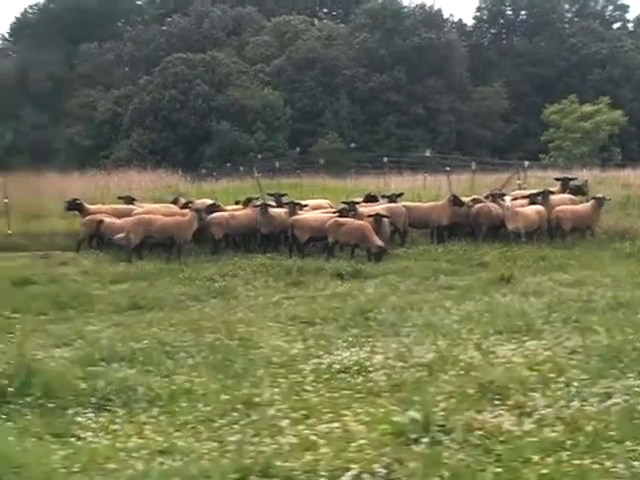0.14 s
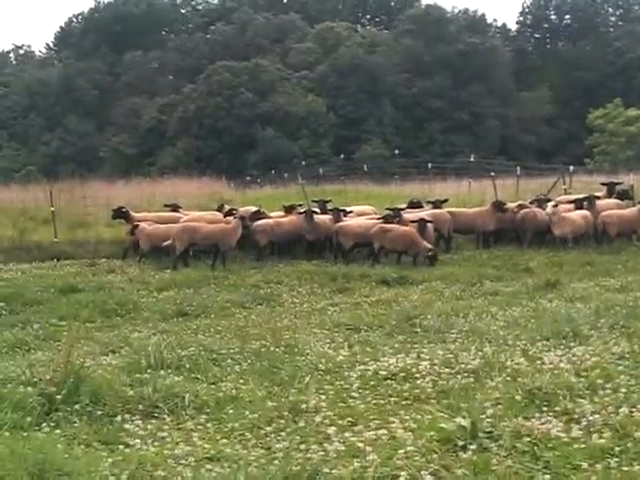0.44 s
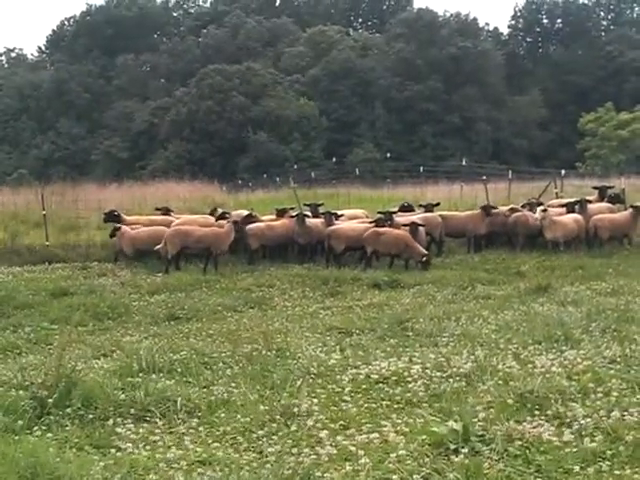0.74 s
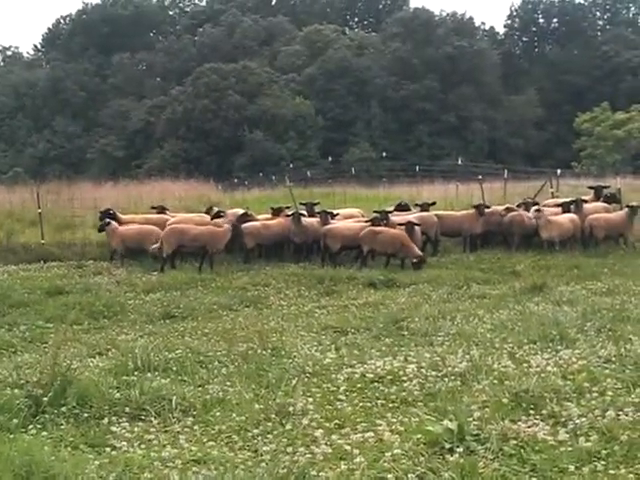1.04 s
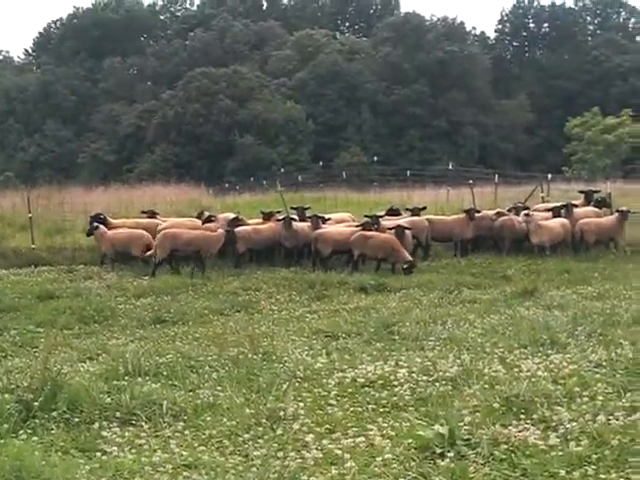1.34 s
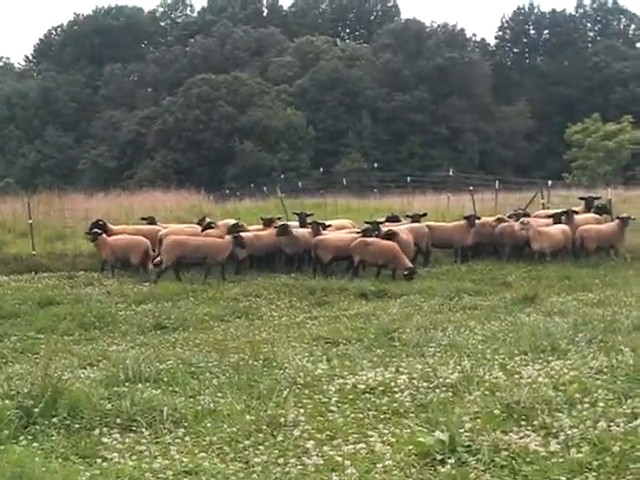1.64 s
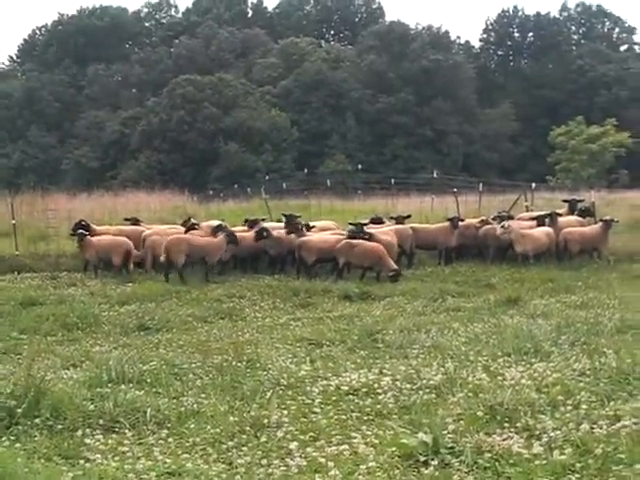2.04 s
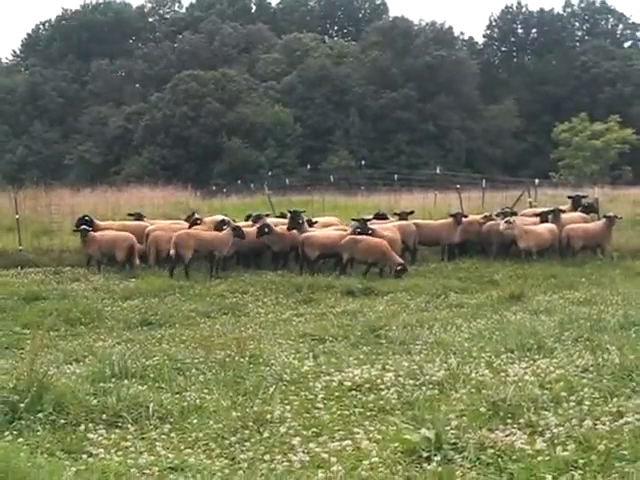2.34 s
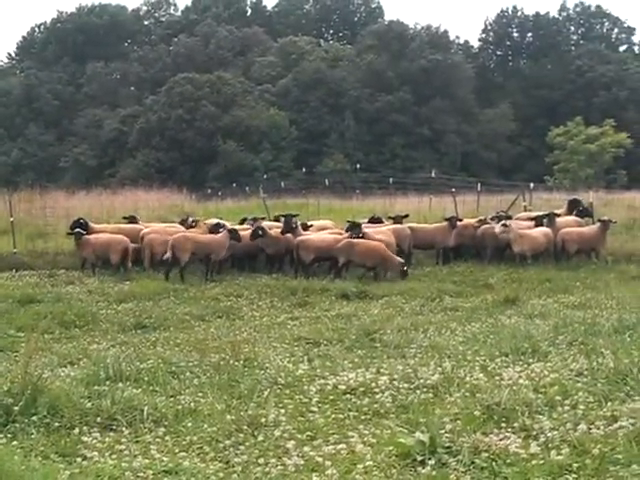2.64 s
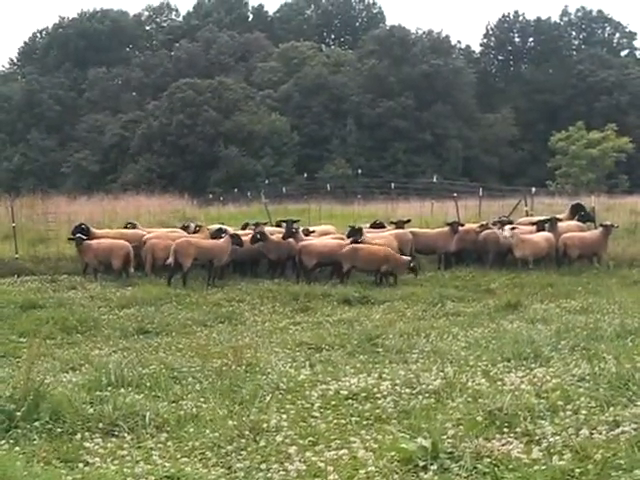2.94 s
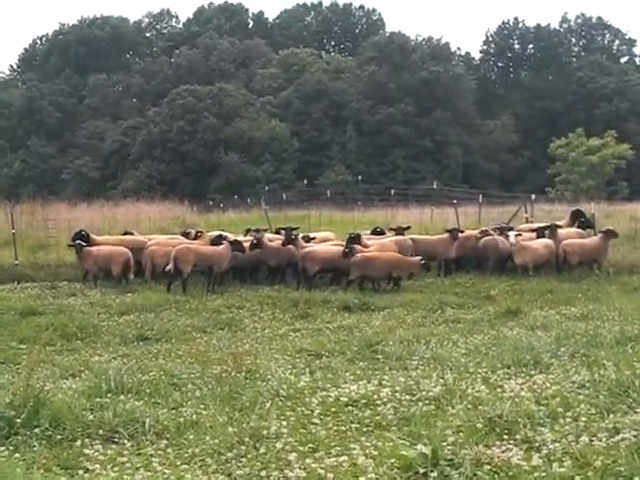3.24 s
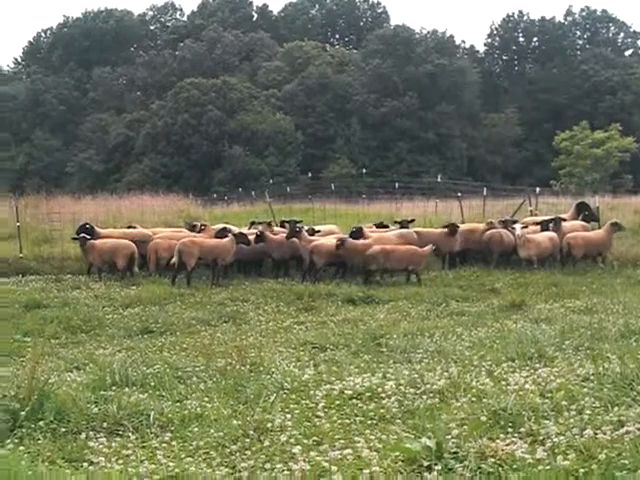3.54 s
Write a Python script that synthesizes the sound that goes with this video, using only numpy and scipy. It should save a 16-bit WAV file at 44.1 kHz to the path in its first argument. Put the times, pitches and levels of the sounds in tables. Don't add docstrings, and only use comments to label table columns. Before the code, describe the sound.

A flock's bleats, one stuttering, one long, one low, over rapid katydid and cricket chirps.

```python
import sys
import numpy as np
from scipy import signal
from scipy.io import wavfile

SR = 44100
rng = np.random.default_rng(int(sys.argv[2]) if len(sys.argv) > 2 else 0)


def how_loud(loudness_db):
    steps = np.asarray(loudness_db, float) / 20
    return 10 ** steps


def generate_wav(sig):
    pcm = np.round(np.clip(np.atleast_2d(sig).T, -1, 1) * 32767).astype(np.int16)
    wavfile.write(sys.argv[1], SR, pcm)


N = 162288
T = np.arange(N) / SR


def columns(rows):
    s, *rest = np.transpose(rows)
    return [np.interp(T, s, c) for c in rest]


def drift(rate_hz):
    r = np.exp(-2 * np.pi * rate_hz / SR)
    slow = signal.lfilter([1], [1, -2 * r, r * r], rng.standard_normal(N + SR))[SR:]
    return slow / slow.std()


def gate(start_s, length_s, edge_s):
    inside_s = np.minimum(T - start_s, start_s + length_s - T)
    return np.sin(np.pi / 2 * np.clip(inside_s / edge_s + .5, 0, 1)) ** 2


def coloured(spectrum, patchy_db):
    hz, db = np.transpose(spectrum)
    out, white = 0, rng.standard_normal((2, N + SR // 4))
    edges = np.geomspace(max(hz[0], 25), min(hz[-1], 13000), 22)
    for k, (low, high) in enumerate(zip(edges, edges[1:])):
        sos = signal.butter(2, [low, high], "band", fs=SR, output="sos")
        band = signal.sosfilt(sos, white[k % 2])[-N:]
        level_db = np.interp(np.log(low * high) / 2, np.log(hz), db)
        out = out + band * how_loud(level_db + patchy_db * drift(4.1))
    return out / out.std()


# pitch_hz, density_db_per_hz
WIND = [(25, -34), (50, -25.5), (70, -5), (120, -0.5), (300, -9.5), (430, -14.5), (1600, -23.5)]


def wind():
    return how_loud(-47) * coloured(WIND, patchy_db=1.5)


# pitch_hz, density_db_per_hz
CHORUS = [(1600, -13.5), (3000, -19), (5000, -20.5), (6500, -17), (7600, -14), (9500, -2), (10600, -6.5),
          (12600, -9.5)]


def chorus():
    return how_loud(-44.5) * coloured(CHORUS, patchy_db=0.6)


# start_s, length_s, level_db; the undertone lies an octave below the second
FAR_FIRST = [(0, 1.1, -73), (0, 0.064, -58), (.08, .06, -57.5), (.16, 0.048, -56), (.195, 0.05, -53.5),
             (.29, 0.025, -60), (.325, 0.055, -51.5), (.39, 0.053, -53.5), (.458, 0.027, -57),
             (.505, 0.017, -55), (.555, 0.026, -51), (.603, 0.036, -59), (.665, 0.11, -58.5),
             (.816, 0.022, -58.5), (.85, 0.097, -60), (.958, 0.06, -60), (1.062, 0.066, -59.5),
             (1.18, 0.028, -59), (1.24, .05, -60)]
FAR_SECOND = [(2.42, 0.21, -58.5), (2.62, 0.49, -58), (3.175, 0.054, -56), (3.255, 0.062, -60),
              (3.17, 0.226, -60.5), (3.39, 0.19, -59.5), (3.468, .036, -61), (3.55, 0.11, -52)]
FAR_UNDERTONE = [(2.42, 0.2, -59.5), (2.75, .4, -56), (3.17, 0.23, -60), (3.45, 0.22, -60)]
# start_s, pitch_hz
FAR_FIRST_PITCH = [(0, 1821), (1.3, 1797)]
FAR_SECOND_PITCH = [(2.4, 1618), (2.85, 1616), (3.18, 1566), (3.68, 1564)]


def far_sheep(bursts, pitch, multiple):
    hz = columns(pitch)[0] * (1 + 0.00402 * drift(25.0))
    turn = 2 * np.pi * np.cumsum(hz) / SR
    level = sum(how_loud(db) * gate(start, length, 0.021) for start, length, db in bursts)
    level = level * how_loud(1.7 * drift(25))
    return np.sqrt(2) * level * np.sin(multiple * turn)


# start_s, end_s, buzzes_per_s
BUZZES = [
    (0, 2.03, 80.4),
    (2.33, 3.68, 85.5),
]


def buzzer():
    beat = 0
    for start, end, rate in BUZZES:
        pulse = (.5 + .5 * np.cos(2 * np.pi * rate * T + 1.0)) ** 1.5
        beat = beat + gate(start, end - start, .05) * pulse
    high = signal.butter(3, 9770, "high", fs=SR, output="sos")
    return how_loud(-36.5) * beat * signal.sosfilt(high, rng.standard_normal(N))


def strokes(times_s, levels_db, length_s, hz, fall_hz, bend):
    out = np.zeros(N + SR)
    u = np.arange(int(length_s * SR)) / (length_s * SR)
    chances = rng.standard_normal((len(times_s), 3))
    for s, db, (pitch_chance, phase_chance, level_chance) in zip(times_s, levels_db, chances):
        stroke_hz = hz * (1 + .003 * pitch_chance) - fall_hz * u ** bend
        turn = 2 * np.pi * np.cumsum(stroke_hz) / SR + 3 * phase_chance
        i = int(max(s, 0) * SR)
        out[i:i + len(u)] += how_loud(db + 1.05 * level_chance) * np.sin(np.pi * u) ** 0.49 * np.sin(turn)
    return out[:N]


# start_s, end_s, pulses_per_s, level_db
TRILLS = [
    (0.014, .09, 66, -55.5),
    (0.093, 0.202, 49, -55.5),
    (0.223, .33, 56, -56),
    (1.839, 2.694, 61, -57.5),
]


def low_trills():
    rows = [(s, db) for a, b, rate, db in TRILLS for s in np.arange(a, b, 1 / rate)]
    return strokes(*np.transpose(rows), 0.011, 4794, 240, 1.0)


# start_s, chirps_so_far
CRICKET_COUNT = [
    [(.014, 0), (.476, 8), (.941, 16), (1.409, 24), (1.877, 32), (1.994, 34)],
    [(2.366, 0), (2.432, 1), (2.828, 8), (3.234, 15), (3.644, 22)],
]


def cricket():
    runs = []
    for run in CRICKET_COUNT:
        s, count = np.transpose(run)
        runs.append(np.interp(np.arange(run[-1][1] + 1), count, s))
    when = np.concatenate(runs)
    return strokes(when - .003, np.full(len(when), -41.), 0.0182, 8750, 790, 4.0)


CHIRP_S = [.0888, .2115, .3408, .4498, .5481, .658, .766, .8696, .9734, 1.0757, 1.181, 1.2845, 1.3916,
           1.5177, 1.64, 1.7546, 1.8636, 1.9755, 2.091, 2.2031, 2.327, 2.4272, 2.5305, 2.6379, 2.7755,
           2.8981, 3.0087, 3.13, 3.2585, 3.39, 3.6085]
LONGER_AFTER_S = [1.45, 3.2]


def katydid():
    spacing_s, stroke_db = .0069, [-38, -32.5, -32.5]
    counts = 4 + np.searchsorted(LONGER_AFTER_S, CHIRP_S)
    rows = [(s - .0026 - spacing_s * (n - 1 - k), stroke_db[min(k, 2)])
            for s, n in zip(CHIRP_S, counts) for k in range(n)]
    return strokes(*np.transpose(rows), .0052, 9782, 680, 2.32)


def voice(start, end, pitch, mouth, hum, throat, jitter, lift_db, bright_db, skirt, snap, hum_fall_db,
          shimmer_db, nose=0 * T, sign=-1):
    part = slice(int(start * SR), int(end * SR))
    hz = (pitch * (1 + jitter * drift(52)))[part]
    k = np.arange(1, 40)[:, None]
    overtone_hz = k * pitch[part]
    lift = how_loud(lift_db + 0 * T)[part]
    tract = 0
    for n, (centre, width, db) in enumerate(throat):
        ring_hz = centre * lift ** (centre < 4000)
        peak = sign ** n * how_loud(db + shimmer_db * drift(13.5)[part])
        tract = tract + peak / (1 + 2j * (overtone_hz - ring_hz) / width) ** skirt
    tract *= how_loud((bright_db + 0 * T)[part] * np.log2(overtone_hz / 2300))
    tract *= 1 + snap * np.exp(-2j * np.pi * k * .62 - ((overtone_hz - 2540) / 860) ** 2)
    tract /= np.sqrt(np.sum(abs(tract) ** 2, axis=0))
    breath = 0.084 * shimmer_db * drift(1300)
    gains = tract * (mouth * (how_loud(shimmer_db * drift(53)) + breath))[part]
    gains += hum[part] * how_loud(-hum_fall_db * np.log2(k))
    gains += nose[part] / (1 + 2j * (overtone_hz - 1340) / 290) ** 2
    turns = np.cumsum(hz) / SR
    out = np.zeros(N)
    out[part] = np.sqrt(2) * np.real(np.sum(gains * np.exp(2j * np.pi * k * turns), axis=0))
    return out * gate(start + 0.0042, end - start - .008, 0.0055)


# centre_s, length_s, level_db, pitch_hz, brightness_db_per_octave
PUFFS = [(1.449, 0.038, -52, 175.2, -5), (1.505, 0.023, -56, 165.2, -3), (1.539, 0.016, -55, 180.5, -6),
         (1.554, .012, -46.5, 182.6, 3), (1.593, 0.024, -42.5, 181.4, 3), (1.63, 0.026, -46.5, 173.9, -3.5),
         (1.666, 0.0244, -37, 177.3, 0), (1.715, 0.022, -36.5, 196.3, 3), (1.741, 0.0314, -38, 204.7, -3),
         (1.796, 0.0198, -39, 191.1, 1), (1.836, 0.0339, -39, 194.9, -1), (1.868, 0.03, -39.5, 202.7, 0),
         (1.921, 0.0362, -41.5, 205.2, -2), (1.954, 0.017, -49, 196.3, 9), (1.983, 0.041, -45, 208.6, 6),
         (2.042, 0.034, -46, 202.2, -2), (2.087, 0.047, -47.5, 204.6, 10), (2.125, 0.025, -54, 209.7, 11),
         (2.189, 0.037, -50, 204, 6)]
# start_s, hum_db, jitter_share
STUTTER_HUM = [
    (1.39, -75, 0.03),
    (1.43, -43, 0.029),
    (1.57, -47.5, 0.028),
    (1.62, -57, 0.033),
    (1.77, -53, 0.02),
    (1.82, -44.5, 0.0077),
    (2.02, -40.5, 0.0052),
    (2.2, -39, 0.0049),
    (2.24, -55, 0.0062),
]
# centre_hz, width_hz, level_db
STUTTER_THROAT = [(750, 160, -15), (1360, 240, -7.5), (1850, 190, -4.5), (2308, 210, 3), (2930, 245, -2.5),
                  (3620, 260, -16.5), (4900, 560, -27)]


def stutter():
    s, length, db, hz, bright_db = np.transpose(PUFFS)
    glide = 151 * length / 2
    knots_s = np.ravel([s - length / 2, s + length / 2], "F")
    pitch = np.interp(T, knots_s, np.ravel([hz - glide, hz + glide], "F"))
    blown = np.minimum(1, sum(gate(a - n / 2, n, 0.026) for a, n in zip(s, length)))
    pitch -= 11.0 * (1 - blown)
    mouth = sum(how_loud(d) * gate(a - n * 0.47, n * 0.96, .016) for a, n, d in zip(s, length, db))
    mouth = mouth + how_loud(-53) * gate(1.57, 0.657, 0.032)
    hum_db, jitter = columns(STUTTER_HUM)
    nose = how_loud(-55 + 3.0 * drift(12)) * gate(1.72, .5, .05)
    return voice(1.39, 2.25, pitch + 3.2 * drift(20.1), mouth, how_loud(hum_db), STUTTER_THROAT,
                 jitter=0.804 * jitter, lift_db=0.21 * drift(7.6), bright_db=np.interp(T, s, bright_db),
                 skirt=1.4, snap=0, hum_fall_db=17.4, shimmer_db=1.9, nose=nose)


# start_s, pitch_hz, mouth_db, hum_db, resonance_lift_db
HUMMED = [
    (2.31, 251.3, -75, -58, 0),
    (2.33, 245, -59, -40, -1),
    (2.365, 200.5, -44, -36, -0.4),
    (2.386, 163.3, -36.5, -35.5, -0.5),
    (2.41, 169.1, -37, -38.5, -0.7),
    (2.45, 175.6, -38.5, -37.5, -0.4),
    (2.526, 180, -41, -35, -0.04),
    (2.566, 180, -41, -34, -0.1),
    (2.59, 178.3, -46, -33.5, 0),
]
OPENED = [
    (2.606, 179, -43, -38, -.7),
    (2.626, 182.4, -35.5, -43, -0.2),
    (2.655, 178.2, -38.5, -39, -0.1),
    (2.704, 187.8, -32.5, -40, 0.06),
    (2.74, 182.4, -33, -40.5, 0),
    (2.79, 187.5, -31, -39.5, 0.12),
    (2.89, 185.5, -29.5, -40, 0.18),
    (3.11, 176.5, -38.5, -47, 0.18),
    (3.174, 170, -52.5, -44, -.5),
]
# centre_hz, width_hz, level_db
CLOSED_THROAT = [(575, 170, -11.5), (1195, 250, -4.5), (1880, 580, -2), (2540, 490, 4.5), (5170, 450, -15),
                 (5950, 560, -15)]
OPEN_THROAT = [(550, 180, -16), (1416, 180, 1.5), (1780, 320, -16), (2343, 188, 4.5), (2700, 180, -11.5),
               (3020, 210, -12.5), (3790, 380, -23.5), (4840, 570, -19), (5900, 1200, -27)]


def long_bleat():
    pitch, mouth_db, hum_db, lift_db = columns(HUMMED + OPENED + [(3.21, 165, -66, -50, -.6)])
    mouth, hum = how_loud(mouth_db), how_loud(hum_db)
    closed = voice(2.31, 2.602, pitch, mouth, hum, CLOSED_THROAT, jitter=0.00092, lift_db=lift_db,
                   bright_db=2.8 * lift_db, skirt=1.88, snap=0, hum_fall_db=23.5, shimmer_db=0.26)
    opened = voice(2.594, 3.21, pitch, mouth, hum, OPEN_THROAT, jitter=0.00088, lift_db=lift_db,
                   bright_db=2.4 * lift_db, skirt=1.9, snap=0, hum_fall_db=12.0, shimmer_db=0.2)
    return closed + opened


# start_s, pitch_hz, mouth_db, hum_db, resonance_lift_db
MUTTER = [
    (3.12, 106, -61, -42, 6),
    (3.145, 108.8, -46, -42.5, -0.4),
    (3.22, 119.3, -49, -43, 0.1),
    (3.27, 126.4, -59, -46, .3),
    (3.36, 131.5, -58, -45.5, 1.5),
    (3.48, 134.3, -57, -40.5, 2.1),
    (3.535, 127.3, -50, -46, 0),
]
GRUMBLE = [
    (3.536, 132, -44, -42, -.2),
    (3.55, 129.2, -37.5, -50, -0.016),
    (3.578, 130.7, -37.5, -60, -0.041),
    (3.604, 120.6, -41, -54, -0.12),
    (3.618, 120.7, -38.5, -39, -0.12),
    (3.636, 129.3, -39.5, -52.5, -0.036),
    (3.656, 130.2, -37.5, -54, -0.038),
    (3.68, 129, -36.5, -50, -0.016),
]
# centre_hz, width_hz, level_db
MUTTER_THROAT = [(280, 74, -5.5), (1032, 330, -8), (1855, 430, -2), (2750, 340, -14)]
LOW_THROAT = [(336, 82, 0), (625, 120, -14), (1250, 400, -11), (1880, 200, 2.5), (2270, 160, 3.5),
              (2420, 81, -10.5), (3200, 280, -30)]


def grumble():
    pitch, mouth_db, hum_db, lift_db = columns(MUTTER)
    mutter = voice(3.12, 3.542, pitch, how_loud(mouth_db), how_loud(hum_db), MUTTER_THROAT, jitter=.003,
                   lift_db=lift_db, bright_db=0, skirt=1.6, snap=0, hum_fall_db=10.3, shimmer_db=1.8)
    pitch, mouth_db, hum_db, lift_db = columns(GRUMBLE)
    opened = voice(3.534, N / SR + .01, pitch, how_loud(mouth_db), how_loud(hum_db), LOW_THROAT, jitter=.003,
                   lift_db=lift_db, bright_db=0, skirt=1, snap=.45, hum_fall_db=8.0, shimmer_db=.6, sign=1)
    return mutter + opened


# delay_s, level_db
ECHOES = [
    (.0031, -14.5),
    (.023, -15),
]


def echoes(flock):
    dull = signal.lfilter([.5], [1, -.5], flock)
    return sum(how_loud(db) * np.interp(T - s, T, dull, 0) for s, db in ECHOES)


def scene():
    flock = far_sheep(FAR_FIRST, FAR_FIRST_PITCH, 1)
    flock += far_sheep(FAR_SECOND, FAR_SECOND_PITCH, 0.98)
    flock += far_sheep(FAR_UNDERTONE, FAR_SECOND_PITCH, .5)
    flock += stutter() + long_bleat() + grumble()
    insects = buzzer() + low_trills() + cricket() + katydid()
    x = flock + echoes(flock) + insects + wind() + chorus()
    return np.array([x, x])


def band_limit(x):
    return signal.sosfilt(signal.butter(12, 13210, fs=SR, output="sos"), x)


def record(dry):
    low = signal.ellip(14, .5, 85, 12050, fs=SR, output="sos")
    return band_limit(signal.sosfilt(low, dry))


dry = scene()
out = record(dry)
generate_wav(out)
```